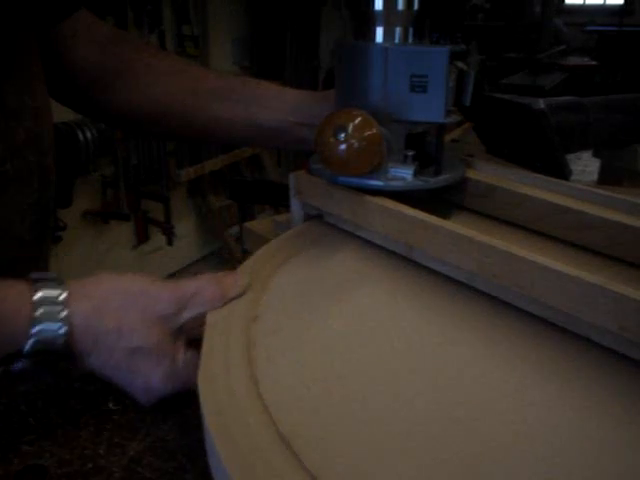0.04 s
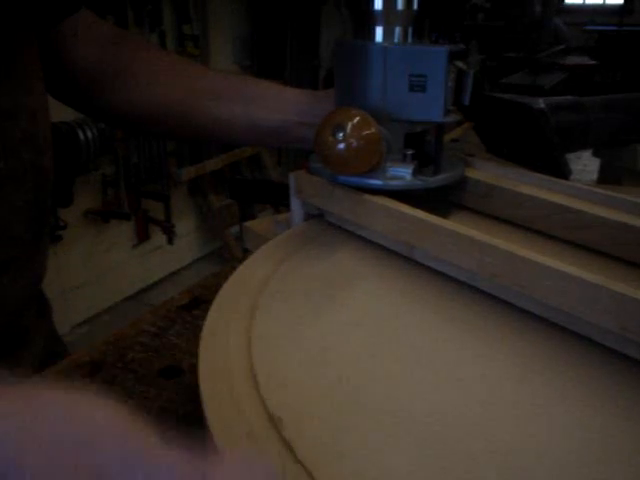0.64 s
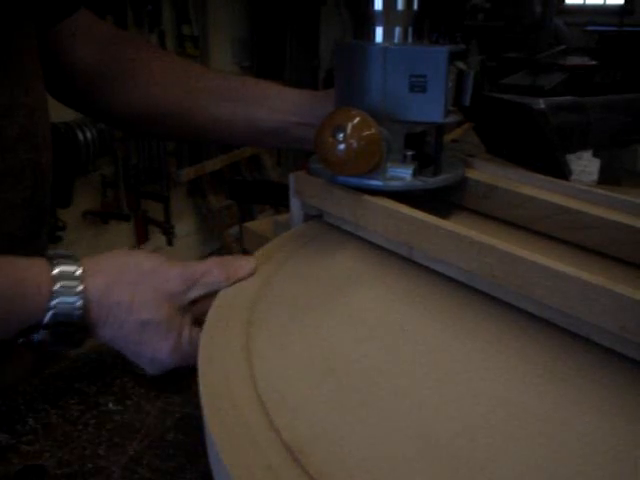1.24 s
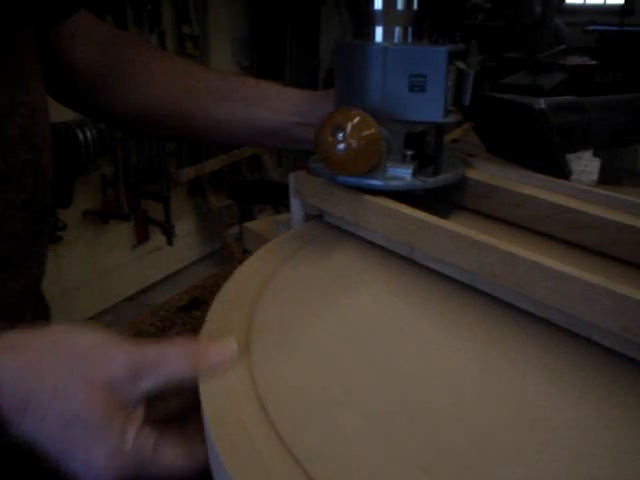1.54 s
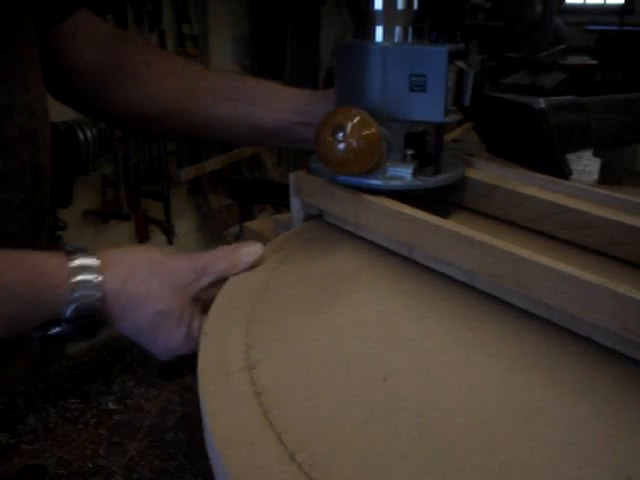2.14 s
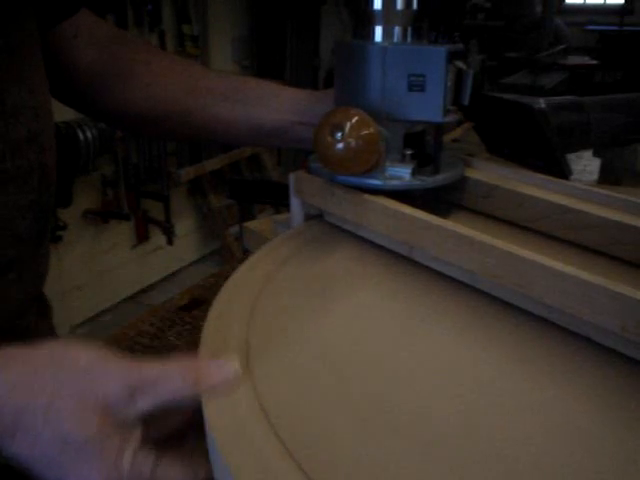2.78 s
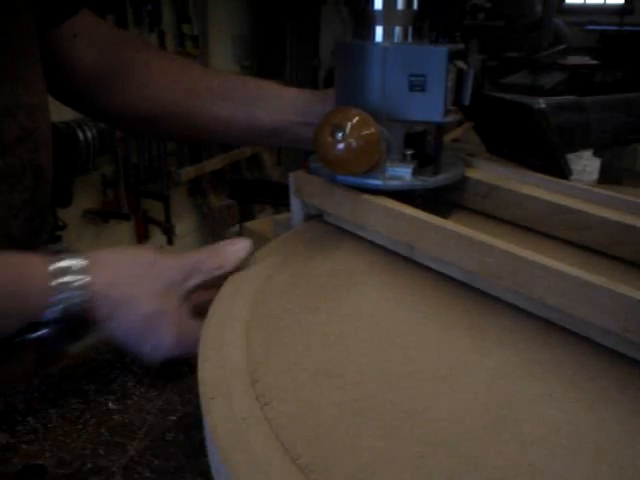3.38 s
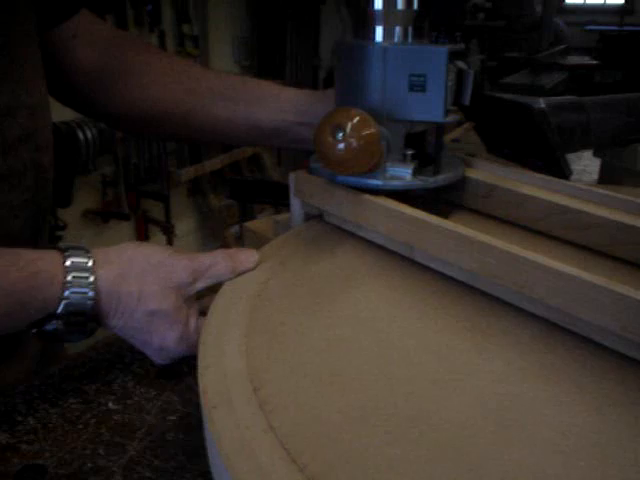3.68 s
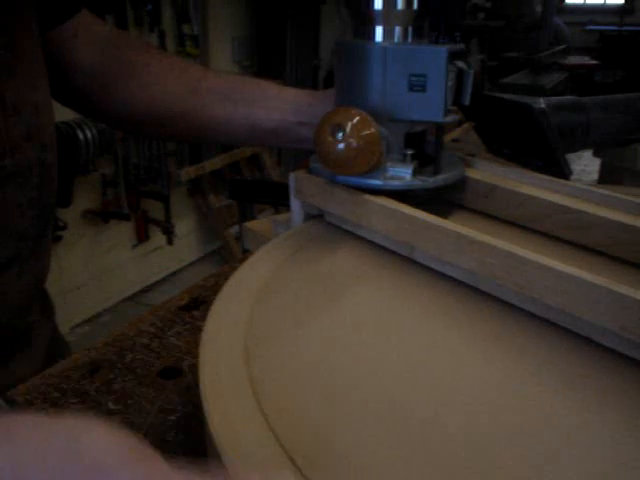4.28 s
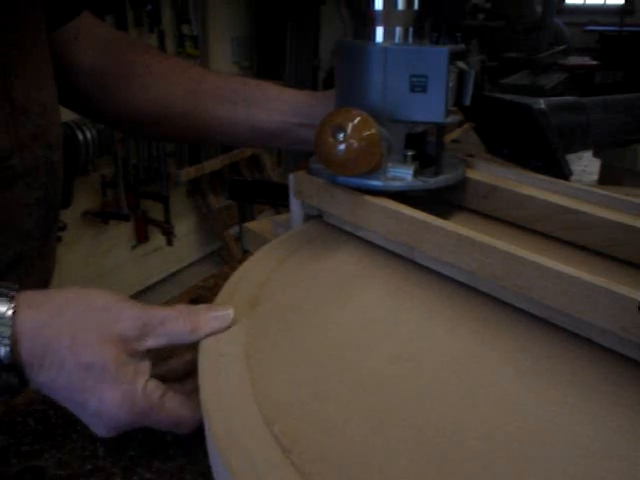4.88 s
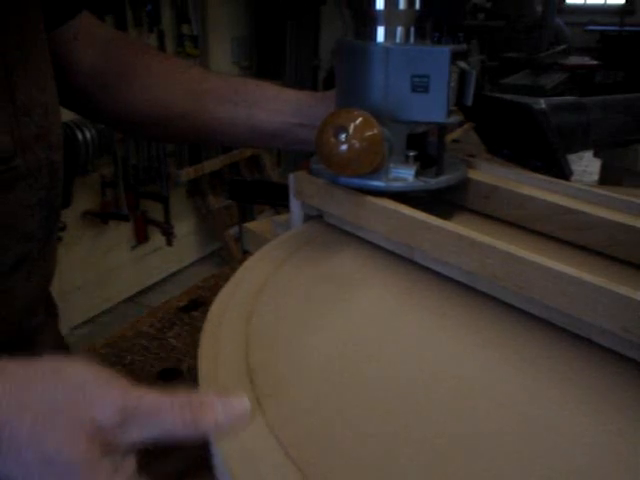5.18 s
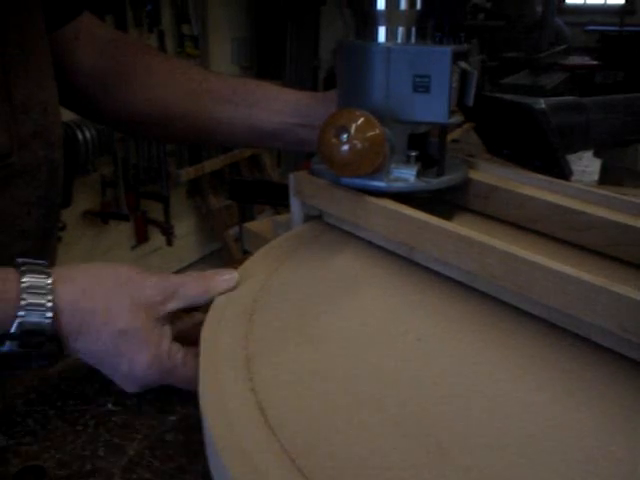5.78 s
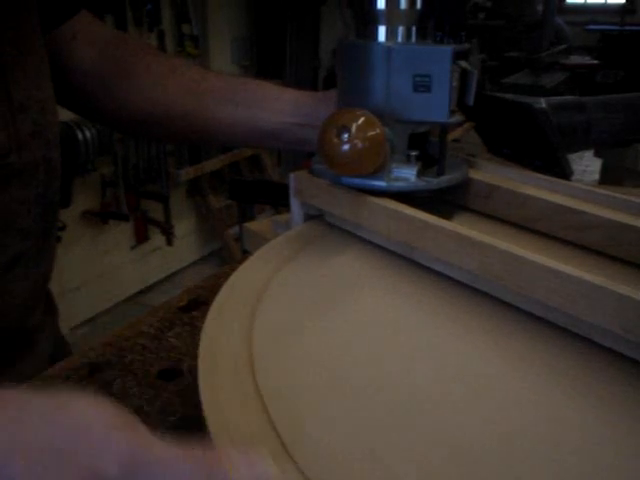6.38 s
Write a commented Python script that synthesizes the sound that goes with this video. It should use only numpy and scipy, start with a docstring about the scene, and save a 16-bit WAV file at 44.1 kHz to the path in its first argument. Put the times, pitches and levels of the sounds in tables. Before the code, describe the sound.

A steady rush of air and a whine of several tones come from a router skimming a wooden disc in a workshop. The motor slows a little under four deeper cuts, the bit buzzing and ringing lightly, and a howling tone returns between them. Near the end, three light cuts barely slow it. A faint crackle continues throughout, and the motor never stops.

```python
"""A router in a wooden sled skims a shallow dish into a disc that is turned by hand, a push at a time.
From the start its fan rushes, its motor whines and a ball bearing sings, over a faint crackle and
workshop hum. Four deep pushes come first: each time the shaft slows a little and the bit's two cutting
edges knock. From about 5 s three light pushes follow, with the motor close to its free speed.
Most tones are "orders" of the shaft: order 3 means three vibrations for every turn."""
import sys
import numpy as np
from scipy import signal
from scipy.fft import rfft, irfft
from scipy.io import wavfile

SR = 44100
rng = np.random.default_rng(int(sys.argv[2]) if len(sys.argv) > 2 else 0)


def generate_wav(sig):
    """Save sig (samples, or channels by samples) to the path in sys.argv[1] as 16-bit PCM at SR."""
    pcm = np.round(np.clip(np.atleast_2d(sig).T, -1, 1) * 32767).astype(np.int16)
    wavfile.write(sys.argv[1], SR, pcm)


N = 287973
TIME = np.arange(N) / SR
FREQS = np.fft.rfftfreq(N, 1 / SR)

# steady hum of the workshop: f/Hz, level/dB
WORKSHOP_HUM = [(120, -86), (257, -74), (376.3, -69)]
# tone colour of the crackle: f/Hz, relative level/dB
CRACKLE_SPECTRUM = [(200, -30), (900, -4.5), (2800, 2), (5000, -3), (8000, -9.5), (10000, -10.5)]
# tone colour of the cooling air: f/Hz, relative level/dB
AIR_SPECTRUM = [(25, -51.5), (55, -37.5), (105, -25), (135, -18.5), (300, -12), (480, -9), (740, -4),
                (1400, -2.5), (2250, -2.5), (2650, -7.5), (4200, -12.5), (7200, -12), (8300, -14.5),
                (10000, -16)]
# resonances of housing, sled and bench that lift the air noise: f/Hz, width/Hz, boost/dB
RESONANCES = [(132.3, 16, 4.5), (196.5, 29, 3.5), (540, 46, 1), (868, 93, 4), (1014, 170, 4),
              (1750, 220, 3), (2110, 380, 3), (3885, 190, 4.5), (4900, 900, 2.5), (5820, 890, 1),
              (6960, 440, 2), (8950, 600, 1)]
# how three bands of air noise move: gain/dB always, then added in a surge, in a lull, at full bite
ROAR_GAINS = (0.07, 2.5, -2.5, -0.2)
RUSH_GAINS = (0.97, 0.69, -1.8, -1.8)
HISS_GAINS = (0.46, .6, -1.4, -0.29)
# bearing tones before side pressure: ball-pass multiple, orders added, free level/dB, cutting level/dB
BEARING_TONES = [(1, 0, -59, -58), (1, 1, -57, -59.5), (1, 2, -62.5, -62.5), (2, 0, -74, -70),
                 (1, 4, -63, -60.5), (1, 6, -70, -75)]
# weaker shaft tones: order, free level/dB, gain/dB on touching wood, gain/dB at full slowdown
SHAFT_TONES = [(5, -52, 0.9, -8.5), (6, -59.5, 1.5, 2.5), (7, -68.5, 4, 6.5), (9, -73.5, 4, 8),
               (10, -67, 5, 4), (11, -69, 0, 2), (12, -71, 5, 2.5), (14, -76, -0.5, -1), (15, -69.5, -2, 1),
               (16, -72.5, 3, 2.5), (20, -82, 5, 5), (24, -81, 1.5, 1.5)]
# whine of the commutator, the motor's spinning switch: t/s, level/dB
WHINE_LEVEL = [(0.0, -59), (1.2, -57.5), (1.62, -51), (1.74, -62), (1.86, -53), (2.16, -58), (2.88, -55),
               (2.94, -61.5), (4.08, -53.2), (4.2, -62.1), (4.32, -51), (4.44, -58.7), (4.8, -53.5),
               (5.34, -59.7), (6.52, -54)]
# overtone of the cutting edges' knock: t/s, level/dB
OVERTONE_LEVEL = [(0.0, -53), (0.6, -51), (0.9, -65), (1.68, -50), (1.98, -64), (2.76, -53.5),
                  (3.18, -54.8), (3.36, -68.7), (4.2, -48.5), (4.74, -60), (5.34, -54.5), (5.82, -58),
                  (6.52, -47.0)]
# turns of the shaft per second: t/s, f/Hz
SHAFT_SPEED = [(0.0, 394.23), (0.42, 391.57), (0.65, 388.01), (0.82, 387.76), (1.16, 392.52),
               (1.35, 393.22), (1.91, 387.39), (2.06, 387.24), (2.32, 391.36), (2.52, 392.8),
               (2.85, 387.93), (3.27, 386.39), (3.51, 390.44), (3.8, 393.34), (4.21, 389.03),
               (4.57, 387.89), (4.88, 391.49), (5.26, 394.17), (5.58, 393.27), (6.08, 395.59),
               (6.53, 391.9)]
# pushes of the disc into the bit: start/s, rise/s, end/s, depth of cut (0-1)
DISC_PUSHES = [(-0.25, 0.76, 0.87, 0.6), (1.16, 0.54, 2.09, 0.7), (2.37, 0.37, 3.38, 0.82),
               (3.61, 0.57, 4.7, 0.64), (4.85, 0.36, 5.08, 0.3), (5.15, 0.06, 5.67, 0.15),
               (5.96, 0.5, 6.55, 0.33)]


def gain_of(db):
    """Turns decibels into a factor to multiply by."""
    return 10 ** (np.asarray(db) / 20)


def unit_level(x):
    """Scales a signal to an average strength (rms) of 1."""
    return x / np.sqrt(np.mean(x ** 2) + 1e-20)


def curve(rows):
    """Joins (time, value) rows by straight lines."""
    return np.interp(TIME, *np.transpose(rows))


def spectrum(rows):
    """Joins (frequency, level) rows along a pitch-like, logarithmic axis."""
    hz, db = np.transpose(rows)
    return np.interp(np.log(FREQS + 1), np.log(hz + 1), db)


def coloured(x, db):
    """Gives a sound the tone colour of a spectrum, at strength 1."""
    return unit_level(irfft(rfft(x) * gain_of(db), N))


def below(x, hz):
    """The part of a sound under a frequency."""
    return irfft(rfft(x) / (1 + (FREQS / hz) ** 12), N)


def delayed(x, lag_s):
    """The same curve, a little later."""
    return np.interp(TIME - lag_s, TIME, x)


def swell(at_s, width_s):
    """A smooth bump of height 1."""
    return np.exp(-((TIME - at_s) / width_s) ** 2)


def drift(rate_hz):
    """A random wander of strength 1, mostly slower than the given rate."""
    count = 4096
    hz = np.fft.rfftfreq(count, TIME[-1] / count)
    slow = irfft(rfft(rng.standard_normal(count)) / (1 + (hz / rate_hz) ** 2))
    return np.interp(TIME, np.linspace(0, TIME[-1], count), unit_level(slow))


def tone(cycles, db, flutter, flutter_hz):
    """One slightly unsteady tone; cycles counts its vibrations so far."""
    angle = 2 * np.pi * (cycles + rng.random())
    wave = (1 + flutter * drift(flutter_hz)) * np.cos(angle)
    wave += flutter * drift(flutter_hz) * np.sin(angle)
    return gain_of(db) * wave * np.sqrt(2 / (1 + 2 * flutter ** 2))


def workshop():
    """Other machines hum at a steady pitch."""
    return sum(tone(hz * TIME, db, flutter=0.28, flutter_hz=3) for hz, db in WORKSHOP_HUM)


def crackle(turns, bite, clicks_per_s=9000):
    """A faint, uneven crackle runs throughout, barely louder during the pushes."""
    chance = clicks_per_s / SR * (1 + 0.5 * np.cos(4 * np.pi * turns))  # bunched twice a turn
    size_db = np.minimum(rng.exponential(1, N), 4)
    sizes = gain_of(size_db) * rng.choice([-1, 1], N)
    clicks = coloured(sizes * (rng.random(N) < chance), spectrum(CRACKLE_SPECTRUM))
    return clicks * gain_of(-54 + 2 * bite + 1.9 * drift(25))


def fan(turns, contact, bite):
    """Air swirls through the housing: a low rumble, a roar, a rush and a hiss, throbbing once a turn."""
    boost_db = sum(db / (1 + (2 * (FREQS - hz) / width) ** 4) for hz, width, db in RESONANCES)
    throb = 1 + 0.09 * np.cos(2 * np.pi * turns)
    air = coloured(rng.standard_normal(N) * throb, spectrum(AIR_SPECTRUM) + boost_db)
    rumble, low, middle = below(air, 540), below(air, 1450), below(air, 2500)
    # the air surges just after the wood leaves the bit, and drops as the wood closes in again
    surge = sum(depth * swell(end + 0.095, width_s=0.12) for _, _, end, depth in DISC_PUSHES)
    lull = np.sqrt(contact) * sum(swell(start + 0.23, width_s=0.12) for start, *_ in DISC_PUSHES)
    flow = np.array([np.ones(N), surge, lull, bite])
    gust = drift(9)
    roar = (low - rumble) * gain_of(np.dot(ROAR_GAINS, flow) + 0.4 * gust)
    rush = (middle - low) * gain_of(np.dot(RUSH_GAINS, flow) + 0.35 * gust)
    hiss = (air - middle) * gain_of(np.dot(HISS_GAINS, flow) + 0.2 * gust + 0.36 * drift(22))
    return gain_of(-42 + 0.57 * drift(60)) * (rumble + roar + rush + hiss)


def bearing(turns, bite, slowdown, passes_per_turn=3.61):
    """Balls roll over a flaw in their track; the turning shaft adds higher tones."""
    tones = np.zeros(N)
    for multiple, added, free_db, cutting_db in BEARING_TONES:
        order = multiple * passes_per_turn + added
        level_db = free_db + bite * (cutting_db - free_db)
        tones += tone(order * turns, level_db, flutter=0.27, flutter_hz=4.1)
    pressure_db = -5 + 6.5 * delayed(slowdown, 0.15)  # side pressure builds as the shaft is slowed
    return tones * gain_of(pressure_db)


def motor(turns, contact, slowdown):
    """The off-balance shaft hums, the commutator whines, and weaker tones shift with the load."""
    wobble_db = -54 - 3 * contact + 1.3 * delayed(slowdown, 0.53)  # the wood steadies the shaft
    tones = tone(turns, wobble_db, flutter=0.097, flutter_hz=7)
    tones += tone(18 * turns, curve(WHINE_LEVEL), flutter=0.18, flutter_hz=18)
    drag = delayed(slowdown, 0.1)
    for order, free_db, contact_db, slowdown_db in SHAFT_TONES:
        level_db = free_db + contact * contact_db + drag * slowdown_db
        tones += tone(order * turns, level_db, flutter=0.22, flutter_hz=6)
    return tones


def howl(turns, speed, contact, quiet_speed_hz=389.18):
    """Order 3 howls when running free, nearly cancels at one shaft speed and returns below it."""
    dip_width_hz = np.where(speed > quiet_speed_hz, 2.45, 3.5)
    distance = np.clip((speed - quiet_speed_hz) / dip_width_hz, -1, 1)
    level = np.hypot(distance * gain_of(-43 - 1.2 * contact), gain_of(-62))  # never quite silent
    return level * tone(3 * turns, 0, flutter=0.11, flutter_hz=13)


def feed(release_s=0.16):
    """The hand pushes the disc in: the bit rubs first (contact), then cuts by the push's depth (bite)."""
    contact, bite = np.zeros(N), np.zeros(N)
    for start, rise, end, depth in DISC_PUSHES:
        push = np.clip(np.minimum((TIME - start) / rise, (end - TIME) / release_s), 0, 1)
        contact += push
        bite += depth * push
    return contact, delayed(bite, 0.06)


def cutter(turns, contact, bite):
    """The two edges knock harder the deeper they bite, with an overtone; the bit rings as it rubs."""
    knock_level = gain_of(-66.5) + bite * gain_of(-47.5)
    knock = knock_level * tone(2 * turns, 0, flutter=0.1, flutter_hz=20)
    overtone = tone(4 * turns, curve(OVERTONE_LEVEL), flutter=0.13, flutter_hz=7.8)
    ring_level = gain_of(-65) + contact * gain_of(-47)
    ring = ring_level * tone(8 * turns, 0, flutter=0.13, flutter_hz=12)
    return knock + overtone + ring


def scene(free_hz=395, loaded_hz=387):
    """One shaft drives all the router's sounds; both channels are the same."""
    speed = curve(SHAFT_SPEED)
    turns = np.cumsum(speed + 0.12 * drift(15)) / SR
    slowdown = (free_hz - speed) / (free_hz - loaded_hz)  # 0 running free, 1 in a full cut
    contact, bite = feed()
    tones = motor(turns, contact, slowdown) + howl(turns, speed, contact)
    tones += cutter(turns, contact, bite) + bearing(turns, bite, slowdown)
    mono = tones + fan(turns, contact, bite) + crackle(turns, bite) + workshop()
    return np.array([mono, mono])


def record(dry, cutoff_hz=10080):
    """Cuts away the highest treble."""
    low_pass = signal.firwin(1023, cutoff_hz, window=("kaiser", 9), fs=SR)
    return signal.oaconvolve(dry, low_pass[None], "same")


dry = scene()
out = record(dry)
generate_wav(out)
```